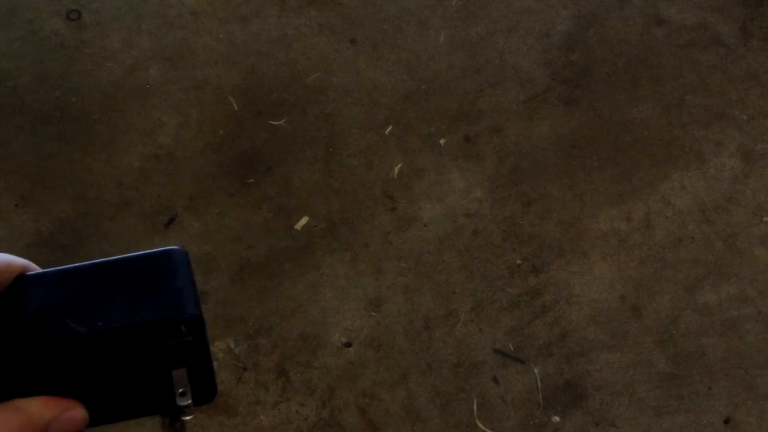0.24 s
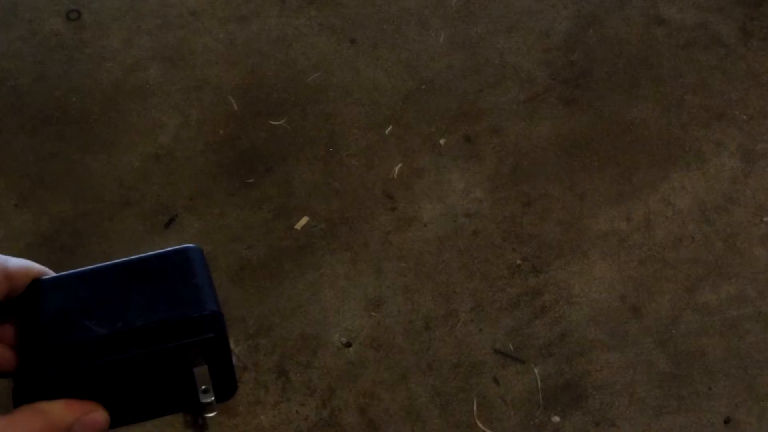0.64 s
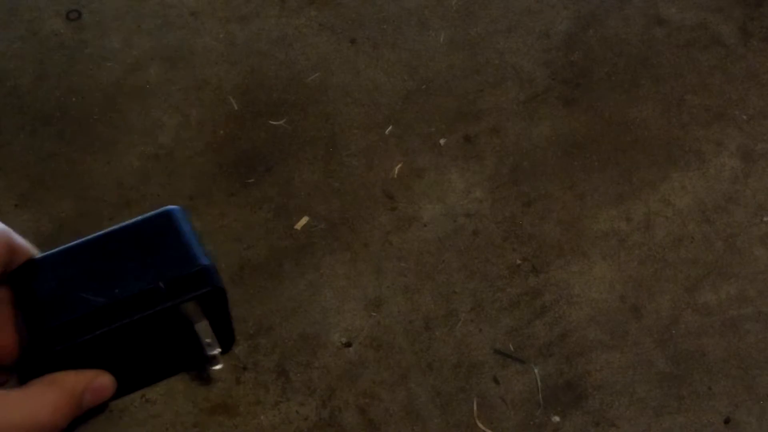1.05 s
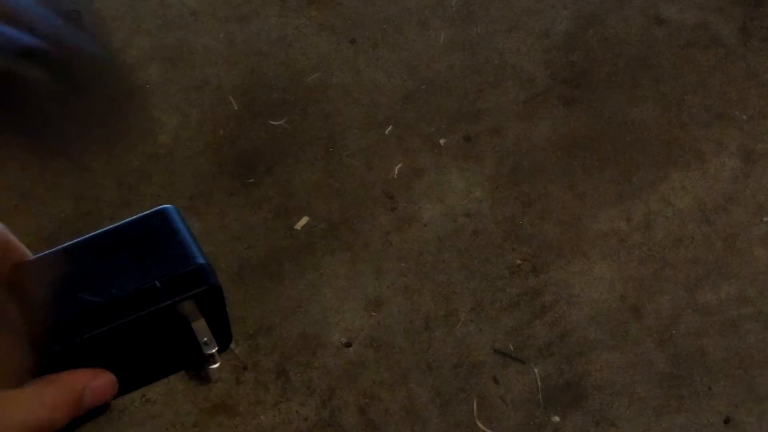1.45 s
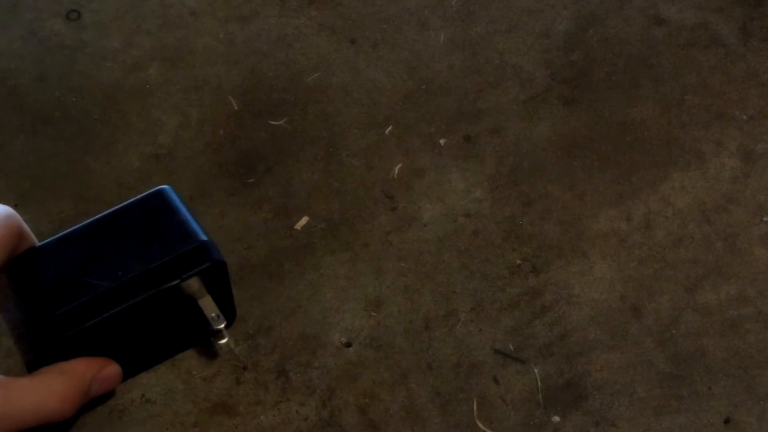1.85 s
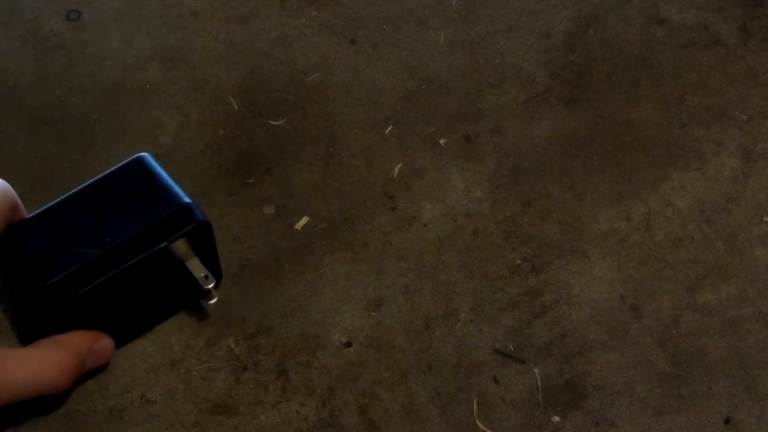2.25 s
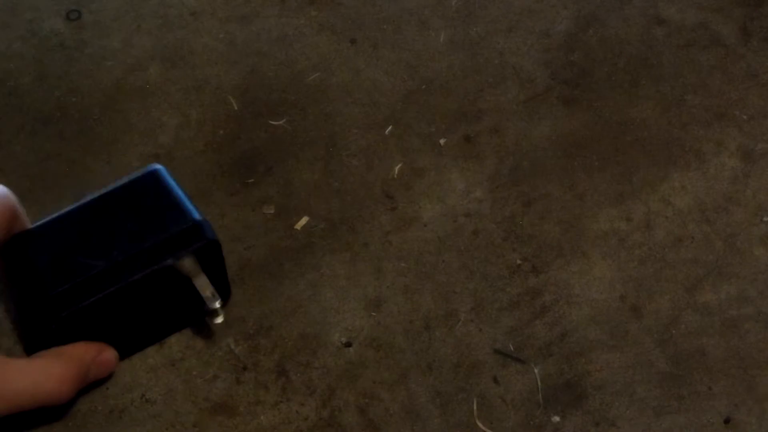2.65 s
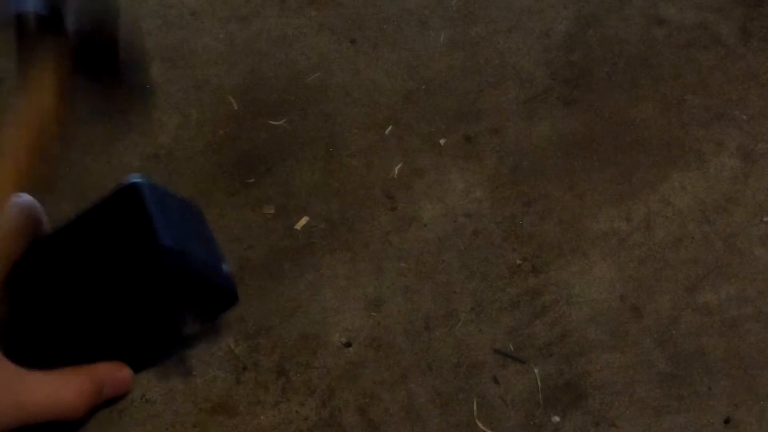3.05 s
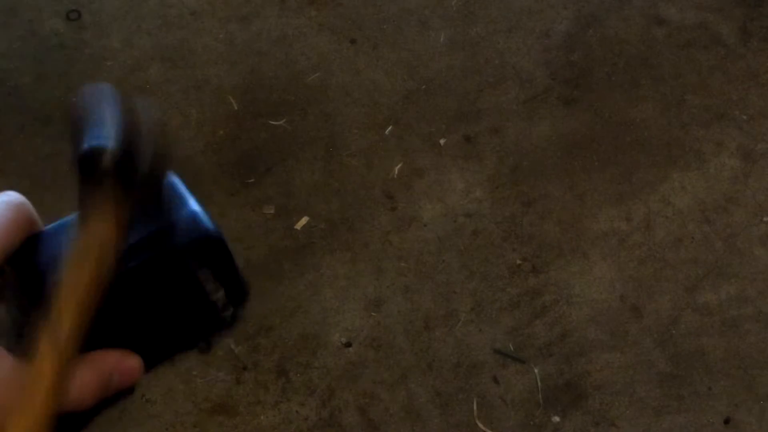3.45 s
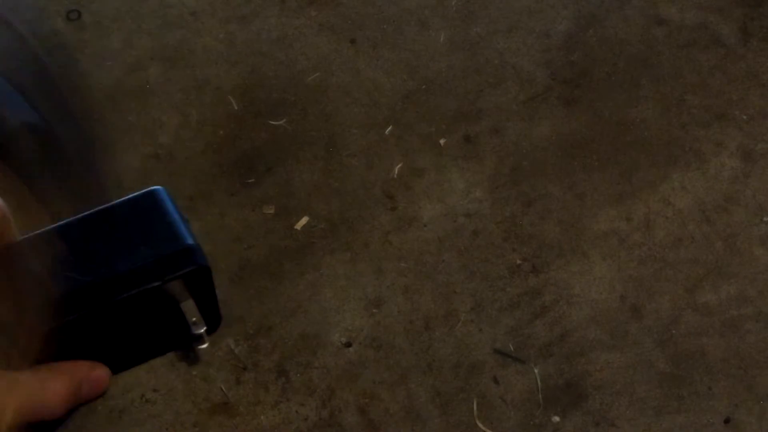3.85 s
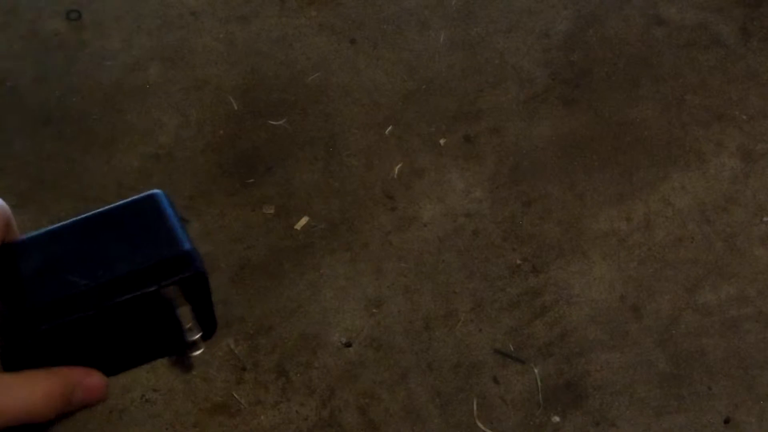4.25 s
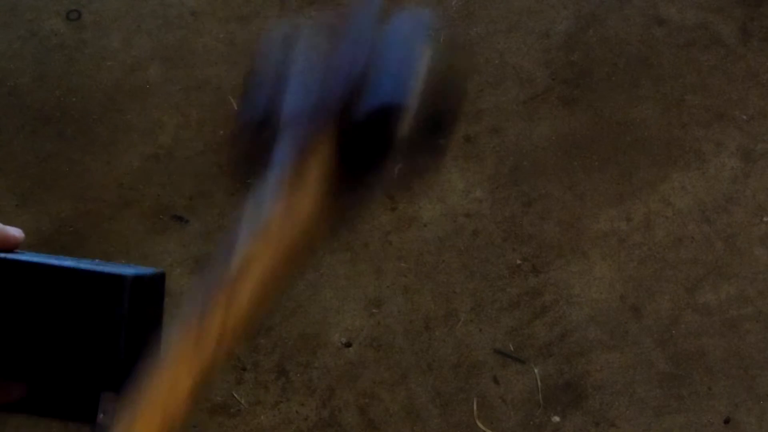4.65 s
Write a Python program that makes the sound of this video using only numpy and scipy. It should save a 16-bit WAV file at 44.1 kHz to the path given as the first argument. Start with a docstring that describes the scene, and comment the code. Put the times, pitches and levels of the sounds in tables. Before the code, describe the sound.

Very loud, close hammer blows on hollow plastic, each a bright crunchy crack with a short clattering ring, a little low thud and a quick room echo. Later hits sound duller and hollower, the last the heaviest. Loose prongs or chips tick and the housing rubs gritty concrete between blows. Faint low hush and hum underneath; the microphone clips and catches puffs of air.

```python
"""A hammer blow is already dying away in a hard, bare room with a low hush and a faint hum.
Then a claw hammer hits a plastic power adapter on the concrete floor again and again: each blow is
a burst of noise, ringing tones for shell, box and floor, echoes, and usually a slow push of air.
Between blows the housing knocks on the floor (short dying tones), a hand shoves it (clumpy noise),
and grit, prongs and chips tick (tiny bright bursts). Peaks that are too loud are cut off flat."""
import sys
import numpy as np
from scipy import signal
from scipy.fft import rfft, irfft, next_fast_len
from scipy.io import wavfile

SR = 44100
rng = np.random.default_rng(int(sys.argv[2]) if len(sys.argv) > 2 else 0)


def master(y):
    """Save y as 16-bit WAV."""
    cut = np.clip(np.atleast_2d(y).T, -1, 1)
    pcm = np.round(cut * 32767)  # scale
    wavfile.write(sys.argv[1], SR, pcm.astype(np.int16))


N = 211661   # length in samples
TIME = np.arange(N) / SR


def from_db(db):
    """Turn decibels into an amplitude factor."""
    return 10 ** (np.asarray(db) / 20)


def unit_energy(x):
    """Scale to an energy of one in each channel."""
    return x / np.sqrt(np.sum(x ** 2, axis=-1, keepdims=True) + 1e-20)


def at_hz(points, hz):
    """Read a table between its rows, with pitch on a logarithmic axis."""
    table_hz, values = np.array(points).T
    return np.interp(np.log(hz), np.log(table_hz), values)


def dying(t, t60):
    """Envelope that falls 60 dB in t60 seconds."""
    return np.exp(-np.log(1000) * t / t60)


def filtered(x, hz, kind):
    """Keep one part of the pitch range (second-order Butterworth filter)."""
    sections = signal.butter(2, np.minimum(hz, SR / 2 - 1), kind, fs=SR, output="sos")
    return signal.sosfilt(sections, x)


def add(track, s, sound):
    """Mix a sound into the track, starting at time s; what falls outside is dropped."""
    start = round(s * SR)
    sound = sound[..., max(-start, 0):max(N - start, 0)]
    start = max(start, 0)
    track[..., start:start + sound.shape[-1]] += sound


def resonances(modes, hz):
    """Power spectrum of a set of resonances with steep skirts; mean 1."""
    centre, width, db = np.array(modes).T[:, :, None]
    skirts = (1 + ((hz - centre) / width) ** 2) ** 2
    power = np.sum(from_db(db) ** 2 / skirts, axis=0)
    return power / power.mean()


def coloured(noise, power_at):
    """Shape noise with the power spectrum power_at(Hz)."""
    length = noise.shape[-1]
    size = next_fast_len(length + SR // 10)
    hz = np.maximum(np.fft.rfftfreq(size, 1 / SR), 1)
    return irfft(rfft(noise, size) * np.sqrt(power_at(hz)), size)[:, :length]


# how alike left and right are in diffuse sound: [f/Hz, correlation]
STEREO_LIKENESS = [(100, 0.92), (600, 0.98), (1200, 0.93), (2400, 0.72), (4500, 0.43), (8000, -0.044),
                   (14000, 0.23)]


def diffuse(gain_at, size):
    """Sound from all around: stereo noise in half-octave bands, each with gain or envelope gain_at(Hz)."""
    edges = 22 * 2 ** np.arange(0, 10, .5)
    white = rng.standard_normal((2, 2, size + SR // 10))   # neighbouring bands use different noise
    out = 0
    for k, (low, high) in enumerate(zip(edges, edges[1:])):
        mid, side = filtered(white[k % 2], [low, high], "band")[:, -size:]
        hz = np.sqrt(low * high)
        alike = np.clip(at_hz(STEREO_LIKENESS, hz), -1, 1)
        shared = np.sqrt(1 + alike) * mid
        opposed = np.sqrt(1 - alike) * np.array([side, -side])
        out = out + gain_at(hz) * (shared + opposed)
    return out


# how long the room rings, as the time to fall 60 dB: [f/Hz, t/s]
REVERB_TIMES = [(100, 0.25), (500, 0.41), (2000, .43), (5000, 0.38), (9000, 0.34), (14000, 0.29)]
# weak, longer ring of the far part of the room: [f/Hz, level/dB]
FAR_RING = [(100, -35), (500, -21.5), (1400, -21), (2100, -17.5), (2900, -21), (4200, -16.5), (5300, -21),
            (7500, -19), (14000, -27.5)]


def room(power_at, build_s=0.012, far_t60=0.8):
    """Countless echoes merge into a noisy wash with the blow's colour, fading at a rate set by pitch."""
    t = TIME[:SR]

    def fading(hz):
        """Near and far ring of one band together."""
        near = dying(t, at_hz(REVERB_TIMES, hz))
        far = from_db(at_hz(FAR_RING, hz)) * dying(t, far_t60)
        return np.hypot(near, far)

    wash = unit_energy(diffuse(fading, SR))
    build_up = 1 - np.exp(-(t / build_s) ** 2)   # echoes take a moment to pile up
    return coloured(wash, power_at) * build_up


def crush(power_at, length_s):
    """Plastic gives way under the hammer face: a dense burst of a few milliseconds."""
    t = TIME[:SR // 20]
    burst = unit_energy(diffuse(lambda hz: 1, len(t))) * np.sqrt(len(t))
    return coloured(burst, power_at) * unit_energy(np.exp(-(t / length_s) ** 2))


def struck(modes, t, spread_db=2):
    """Resonances ring as dying tones; chance varies their strengths from hit to hit. Energy 1."""
    hz, width, db = np.array(modes).T[:, :, None]
    strength, sign = rng.standard_normal((2, len(modes), 1))
    rings = unit_energy(np.sin(2 * np.pi * hz * t) * np.exp(-np.pi * width * t))
    gains = np.sign(sign) * from_db(db + spread_db * strength)
    return unit_energy(np.sum(gains * rings, axis=0))


def favoured(modes, spot_hz, lead_db, tilt_db, chance_db=0.9):
    """The spot that is hit feeds the wall resonances near one pitch and its octaves most."""
    hz, width, db = np.transpose(modes)
    octaves = np.log2(hz / spot_hz)
    lead = lead_db * np.cos(2 * np.pi * octaves)
    chance = chance_db * rng.standard_normal(len(hz))
    return np.transpose([hz, width, db + lead + tilt_db * octaves + chance])


def fracture_ripple(size=2000, ripple_db=1.92, spacing_hz=109.7):
    """Every fracture has its own chance peaks and dips in pitch, as a function Hz -> dB."""
    bumps = rng.standard_normal(size)
    return lambda hz: ripple_db * np.interp(hz / spacing_hz, np.arange(size), bumps)


# resonances of the plastic walls: [f/Hz, width/Hz, level/dB]
WALL_MODES = [(1770, 240, -2.5), (2008, 180, 0), (2376, 310, 0), (2617, 28, 1.5), (2830, 150, -2.5),
              (3168, 200, 0.5), (3540, 90, -7), (3685, 620, -0.5), (4138, 110, 0), (4470, 310, -4),
              (5030, 290, -12)]
# resonances of the whole hollow box, damped by the hand: [f/Hz, width/Hz, level/dB]
BOX_MODES = [(660, 150, 2), (825, 24, 1), (1010, 120, -2), (1180, 230, -1), (1380, 490, -6.5)]
# low resonances of the box pressed on the floor: [f/Hz, width/Hz, level/dB]
FLOOR_MODES = [(101, 39, 2), (215, 41, -3.5), (286, 7.9, 5), (360, 87, -1)]
# colour of the crack: [f/Hz, level/dB]
CRACK_SPECTRUM = [(100, -15), (320, -21), (510, -11.5), (650, -6.5), (1300, -6), (2500, -6.5), (5400, 1.5),
                  (8500, 0), (11000, 0), (14000, 1)]
# first echoes from the nearest walls: [delay t/s, level/dB, treble cut f/Hz]
FIRST_ECHOES = [(0.0065, -18.5, 7000), (0.0102, -13.5, 4530), (0.0147, -7.5, 14000), (0.0224, -8, 8890)]
BOX_BELOW_CRACK_DB = 21   # at a spot of hollowness zero
# a hollow spot passes more of the blow to the floor (dB per dB)
THUD_BELOW_SHELL_DB, THUD_PER_HOLLOW = 19.5, 0.29
# treble tilt (dB per octave); a hollow spot rings duller (dB per octave per dB)
SHELL_TILT_DB, DULLING_PER_HOLLOW = 0.1, 0.59
SPOT_LEAD_DB = 2.03   # lead of the favoured wall resonances


def blow(crack_db, shell_db, hollow_db, spot_hz,
         crush_db=4.0, crush_s=0.0049, echo_s=0.0031, ring_db=-2.5, room_db=0.41):
    """One blow: the crush, the ring of walls, box and floor, and the room's answer."""
    tilt_db = SHELL_TILT_DB - DULLING_PER_HOLLOW * hollow_db
    walls = favoured(WALL_MODES, spot_hz, SPOT_LEAD_DB, tilt_db)
    box_db = crack_db - BOX_BELOW_CRACK_DB + hollow_db
    thud_db = shell_db - THUD_BELOW_SHELL_DB + THUD_PER_HOLLOW * hollow_db
    parts = [(walls, shell_db), (BOX_MODES, box_db), (FLOOR_MODES, thud_db)]
    ripple_at = fracture_ripple()

    def power_at(hz):
        """Spectrum of the whole blow."""
        crack = from_db(crack_db + at_hz(CRACK_SPECTRUM, hz)) ** 2
        housing = sum(from_db(db) ** 2 * resonances(modes, hz) for modes, db in parts)
        return (crack + housing) * from_db(ripple_at(hz)) ** 2

    ring = sum(from_db(db) * struck(modes, TIME[:SR // 10]) for modes, db in parts)
    sound = from_db(room_db) * room(power_at)
    add(sound, 0, from_db(crush_db) * crush(power_at, crush_s))
    add(sound, 0, from_db(ring_db) * ring)
    for delay_s, db, cut_hz in FIRST_ECHOES:   # cluttered walls scatter the burst: fresh noise each time
        echo = filtered(crush(power_at, echo_s), cut_hz, "low")
        add(sound, delay_s, from_db(db) * echo)
    return sound


# hammer blows, the first one already dying away; the levels and pushes are relative:
# [t/s, crack level/dB, shell level/dB, hollowness of the spot/dB, favoured wall f/Hz, signed air push]
HAMMER_BLOWS = [(-0.33, 18, 16.5, -4, 2700, 0), (0.1012, 22, 21, -2.5, 2430, -0.16),
                (0.484, 22.5, 19.5, -1.5, 2700, -0.2), (0.8695, 24, 18.5, -4.5, 2560, -0.082),
                (1.6208, 23, 21.5, 3.5, 2810, -0.09), (2.124, 22.5, 19.5, 0, 1890, 0.56),
                (2.6376, 20, 15, 2.5, 2070, -0.51), (3.1189, 23, 17.5, 7, 2230, -0.49),
                (3.5627, 22.5, 15, 8.5, 2210, -0.9), (4.0041, 28, 22.5, 7.5, 2650, -1.3)]


def hammer():
    """The hammer strikes the adapter: all blows in turn, overlapping as they ring out."""
    out = np.zeros((2, N))
    for s, crack_db, shell_db, hollow_db, spot_hz, _ in HAMMER_BLOWS:
        add(out, s, blow(crack_db, shell_db, hollow_db, spot_hz))
    return out


# colour of the hush, relative: [f/Hz, level/dB per Hz]
HUSH_SPECTRUM = [(25, -1), (58, -1), (85, -5), (118, -5), (180, -16.5), (300, -20.5), (700, -24.5),
                 (2000, -32), (14000, -39)]
# faint hum in the room: [f/Hz, rms level/dB]
HUM_TONES = [(57, -63), (118, -76)]


def steady(spectrum):
    """Unchanging stereo noise of a given colour, rms 1."""
    return np.sqrt(N) * unit_energy(diffuse(lambda hz: from_db(at_hz(spectrum, hz)), N))


def room_tone(hush_db=-58):
    """The quiet room: low noise for the hush and steady sine tones for the hum."""
    hum = sum(from_db(db) * np.sqrt(2) * np.sin(2 * np.pi * hz * TIME) for hz, db in HUM_TONES)
    return from_db(hush_db) * steady(HUSH_SPECTRUM) + hum


def air_puffs(width_s=0.013, low_hz=3.0, gain_db=-10.5, right_db=2.2, left_lag_s=0.0015):
    """Blows shove air past the microphone's two ports: one slow half wave, then a slow settling."""
    out = np.zeros((2, N))
    hump = np.sin(np.pi * np.minimum(TIME[:SR // 20] / width_s, 1))
    for s, *_, push in HAMMER_BLOWS:
        add(out[0], s + left_lag_s, push * hump)
        add(out[1], s, from_db(right_db) * push * hump)
    leak = signal.butter(1, low_hz, "high", fs=SR, output="sos")
    return from_db(gain_db) * signal.sosfilt(np.vstack([leak, leak]), out)


# the housing drops back on the floor: [t/s, energy level/dB, f/Hz]
HOUSING_KNOCKS = [(1.097, -17, 1000), (1.731, -6, 1000), (2.245, -3, 1250), (2.7645, -12, 1300),
                  (3.686, -5, 1900), (3.752, -9.5, 1900), (4.119, 2, 1600)]


def knocks():
    """Dull taps of the hand-damped box: one tone each that dies within milliseconds."""
    out, t = np.zeros((2, N)), TIME[:SR // 20]
    damped = dying(t, .008)
    for s, db, hz in HOUSING_KNOCKS:
        tap = unit_energy(np.sin(2 * np.pi * hz * t) * damped)
        add(out, s, from_db(db) * tap)
    return out


# the hand shoves the housing over the concrete: [start t/s, length t/s, level/dB]
HAND_SHOVES = [(1.1, 0.069, -48), (3.39, 0.044, -53), (3.751, 0.24, -48.5), (4.333, 0.17, -54.5),
               (4.525, 0.096, -51.5)]


def shoving(attack_s=0.023, release_t60_s=0.55):
    """Strength of the rubbing: each shove sets in, holds and dies away."""
    strength = 0
    for start, length, db in HAND_SHOVES:
        onset = np.clip((TIME - start) / attack_s, 0, 1)
        release = dying(np.maximum(TIME - start - length, 0), release_t60_s)
        strength = strength + from_db(db) * onset * release
    return strength


# resonances that rubbing wakes in the housing, and a broad hiss of grit: [f/Hz, width/Hz, level/dB]
RUB_MODES = [(1320, 230, -0.5), (1950, 400, 2), (4150, 430, -2.5), (8000, 6300, -5)]


def sliding(grains_per_s=5000, size_db=0.5, stick_db=2.1, stick_s=0.0093):
    """Plastic rubs over the floor: grains of grit catch in uneven clumps and excite the housing."""
    caught = rng.random(N) < grains_per_s / SR
    sizes = from_db(size_db * np.minimum(rng.exponential(1, N), 4))
    kicks = rng.standard_normal(N) + rng.standard_normal((2, N)) / 2   # shared part + own part per side
    grains = caught * sizes * kicks
    rub = np.sqrt(N) * unit_energy(coloured(grains, lambda hz: resonances(RUB_MODES, hz)))
    stick = np.interp(TIME / stick_s, np.arange(N), rng.standard_normal(N))   # random catch and slip
    return shoving() * from_db(stick_db * stick) * rub


def crumbs(count=12, per_s=28, crumb_db=24, spread_db=0.5):
    """Grit snaps at random during a shove, crumb_db above its level: list of (s, energy dB)."""
    snaps = []
    for start, length, db in HAND_SHOVES:
        after = np.cumsum(rng.exponential(1, count)) / per_s
        sizes = db + crumb_db + spread_db * rng.standard_normal(count)
        snaps += [(start + s, size) for s, size in zip(after, sizes) if s < length]
    return snaps


# a prong or chip drops on the floor: [t/s, energy level/dB before the dull click is added]
DROPPED_BITS = [(1.2196, -12), (1.7713, 8), (1.8825, -8), (2.2712, 3), (2.426, -16.5), (2.58, -31),
                (3.2746, -9), (3.303, -11), (3.4743, -20), (3.529, -25), (3.89, -10.5), (3.943, -5.5),
                (4.343, -7.5), (4.4757, -20), (4.541, -14.5)]


def drops(bounce_s=0.0067, bounce_db=-17.5, follows=0.2):
    """Each prong or chip bounces once, never harder than it fell: list of (s, energy dB)."""
    # the bounce follows the drop only weakly (dB per dB)
    bounces = [(s + bounce_s, min(db, bounce_db + follows * db)) for s, db in DROPPED_BITS]
    return DROPPED_BITS + bounces


def ticks(contacts, bright_hz=(8000, 14000), dull_hz=(1500, 6000), dull_db=-8):
    """Hard little contacts: a glassy snap with a weaker click of the plastic under it."""
    out, t = np.zeros((2, N)), TIME[:SR // 20]
    contact = dying(t, .0065)
    for s, db in contacts:
        common, left, right = rng.standard_normal((3, len(t))) * contact
        snap = common + np.array([left, right]) / 2
        bright = unit_energy(filtered(snap, bright_hz, "band"))
        dull = unit_energy(filtered(snap, dull_hz, "band"))
        add(out, s, from_db(db) * (bright + from_db(dull_db) * dull))
    return out


def scene(contact_room_db=-10.5, rub_room_db=-6.0):
    """Blows, air, small contacts and rubbing over the room tone; contacts and rubbing echo too."""
    work = hammer() + room_tone() + air_puffs()
    rub = sliding()
    contacts = knocks() + ticks(crumbs()) + ticks(drops())
    sent = from_db(contact_room_db) * contacts + from_db(rub_room_db) * rub
    reverberation = room(np.ones_like)   # the room's answer, without any blow's colour
    echoed = signal.fftconvolve(sent, reverberation, axes=1)[:, :N]
    return work + contacts + rub + echoed


def record(dry, top=0.83, cutoff_hz=14250):
    """The microphone input overloads: peaks beyond top are cut flat, then the highest treble is removed."""
    steep = signal.ellip(12, .1, 70, cutoff_hz, fs=SR, output="sos")
    return signal.sosfilt(steep, np.clip(dry, -top, top))


dry = scene()
out = record(dry)
master(out)
```